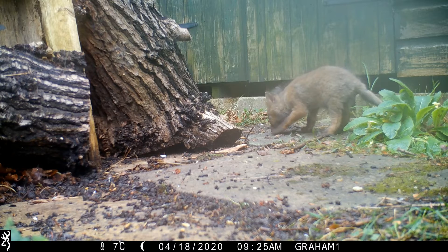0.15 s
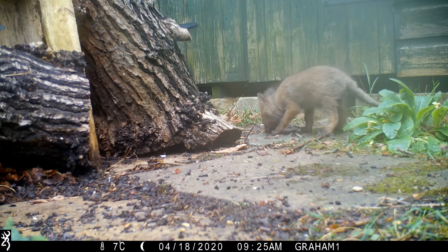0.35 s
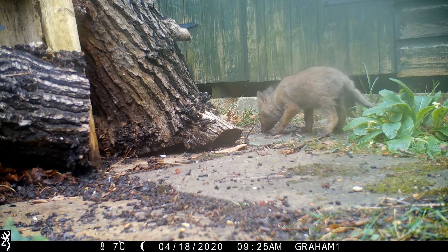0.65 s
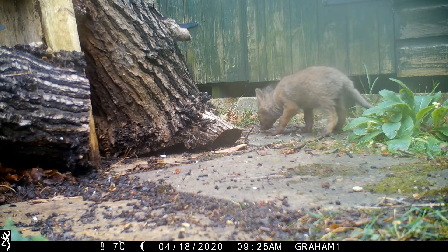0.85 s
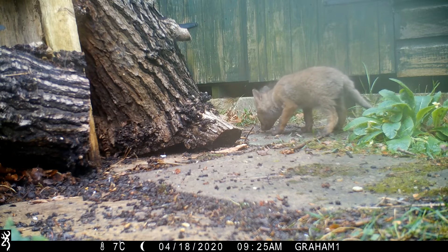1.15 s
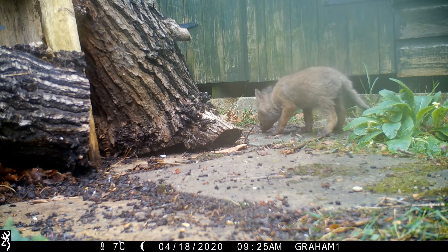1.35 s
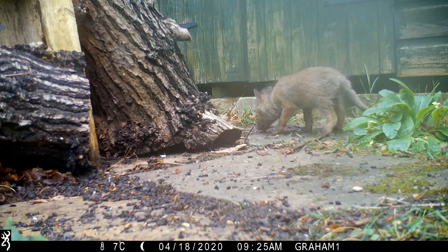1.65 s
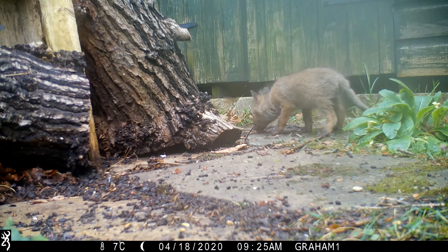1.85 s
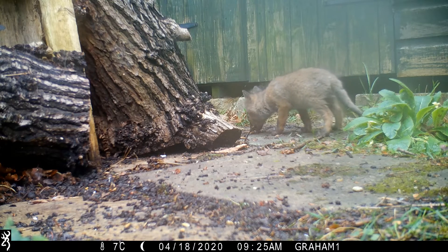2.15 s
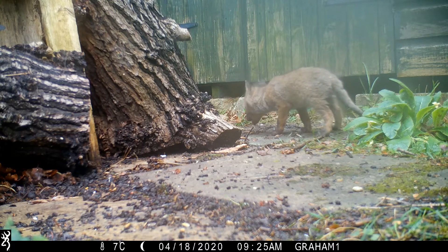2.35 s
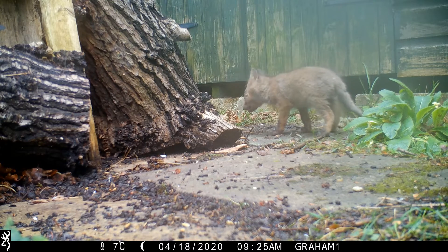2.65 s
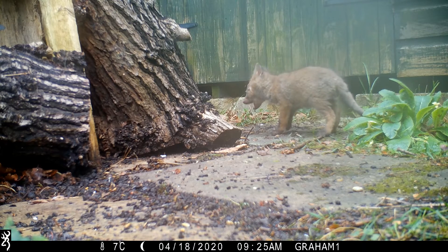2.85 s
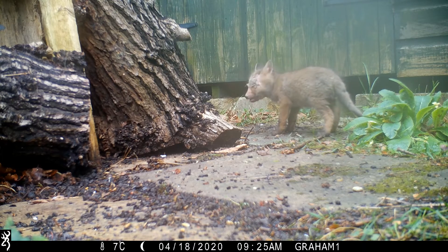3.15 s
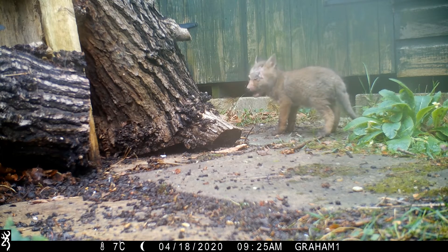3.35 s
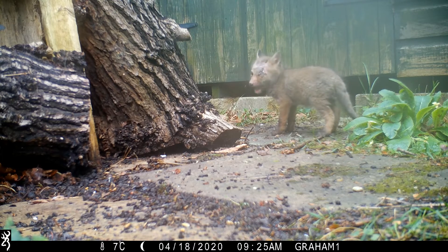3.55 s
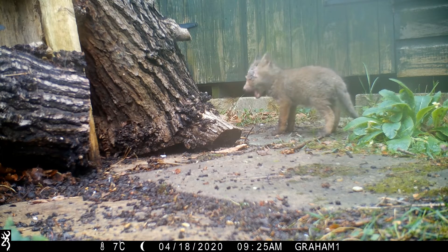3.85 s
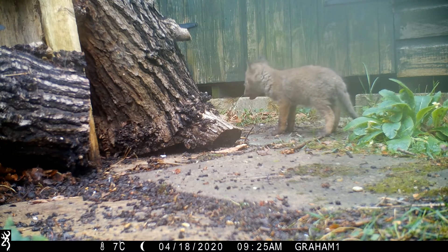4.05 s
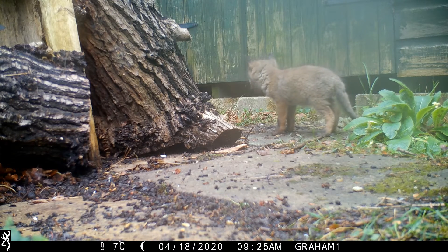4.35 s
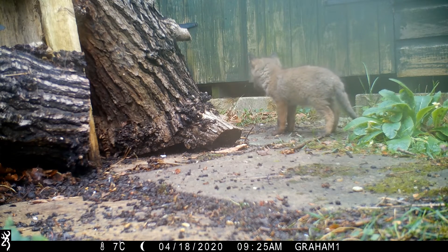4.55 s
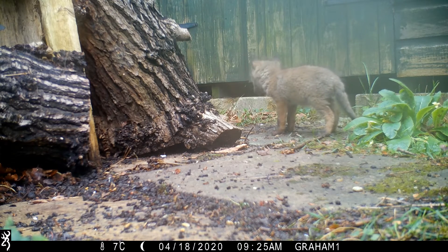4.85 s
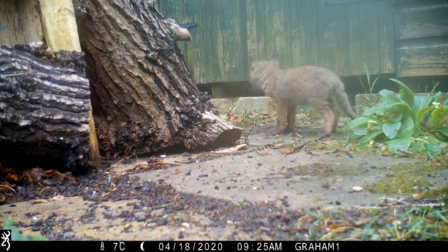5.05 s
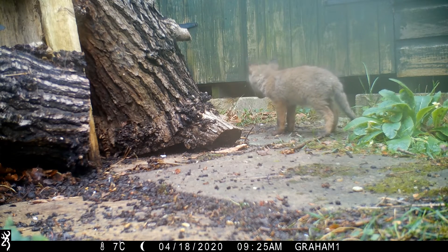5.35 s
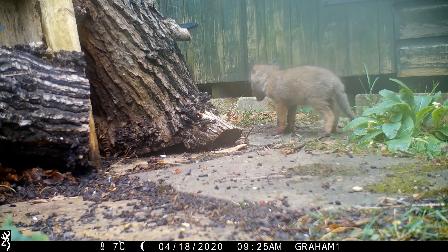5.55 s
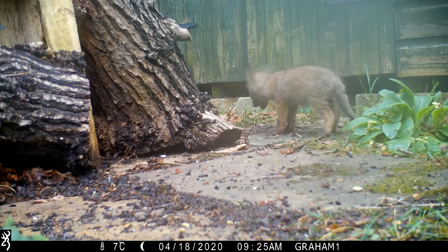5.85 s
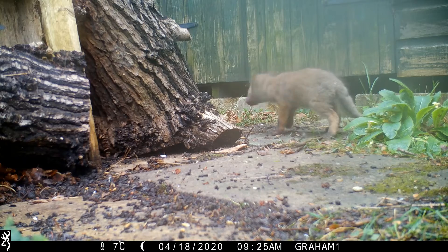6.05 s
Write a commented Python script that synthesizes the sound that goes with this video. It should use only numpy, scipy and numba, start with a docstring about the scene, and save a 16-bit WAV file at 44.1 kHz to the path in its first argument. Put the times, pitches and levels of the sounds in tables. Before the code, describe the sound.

A harsh magpie-like rattle runs for two seconds over a soft outdoor rush and faint birds, with one loud pop near the end.

```python
"""A fenced garden corner where a fox cub noses about, under a soft outdoor rush.
Small birds whistle far off and something scuffs grains of soil and leaf litter. A harsh rattle, most like
a magpie's, runs for two seconds: syrinx pulses through throat and bill, echoing off hard walls.
A trail camera adds a thin electronic whine and, near the end, one loud pop that overloads it."""
import sys
import numpy as np
from scipy import signal
from scipy.fft import rfft, irfft, next_fast_len
from scipy.io import wavfile
from scipy.ndimage import uniform_filter1d
from numba import njit

SR = 44100
rng = np.random.default_rng(int(sys.argv[2]) if len(sys.argv) > 2 else 0)


def persist_wave(psi):
    """Save psi, clipped to +-1, as 16-bit WAV."""
    counts = np.round(np.clip(psi, -1, 1) * 32767).astype(np.int16)
    wavfile.write(sys.argv[1], SR, np.atleast_2d(counts).T)


N = 273361
TIME = np.arange(N) / SR


def from_db(db):
    """Decibels to gain."""
    return 10 ** (np.asarray(db) / 20)


def unit_rms(x):
    """Scale to rms 1."""
    return x / np.sqrt(np.mean(x ** 2) + 1e-20)


def cut(x, hz, kind, order=2):
    """Butterworth low- or high-pass."""
    return signal.sosfilt(signal.butter(order, min(hz, .45 * SR), kind, fs=SR, output="sos"), x)


def resonate(x, hz, width_hz):
    """Two-pole resonance, peak gain 1."""
    r = np.exp(-np.pi * width_hz / SR)
    feedback = [1, -2 * r * np.cos(2 * np.pi * hz / SR), r * r]
    return signal.lfilter(np.array([1, 0, -1]) * (1 - r * r) / 2, feedback, x + 1e-18)


@njit
def moving_resonance(x, hz, width_hz):
    """Two-pole resonance with one centre frequency per sample."""
    r = np.exp(-np.pi * width_hz / SR)
    out = np.zeros(len(x))
    for i in range(2, len(x)):
        drive = (1 - r * r) / 2 * (x[i] - x[i - 2])
        out[i] = drive + 2 * r * np.cos(2 * np.pi * hz[i] / SR) * out[i - 1] - r * r * out[i - 2]
    return out


def drift(rate_hz):
    """Piecewise-linear random wander, rms 1."""
    knots = rng.standard_normal(int(TIME[-1] * rate_hz) + 2)
    return unit_rms(np.interp(TIME * rate_hz, np.arange(len(knots)), knots))


def swell(peak_s, rise_s, fall_s):
    """Asymmetric Gaussian envelope."""
    return np.exp(-.5 * ((TIME - peak_s) / np.where(TIME < peak_s, rise_s, fall_s)) ** 2)


def scatter(x, t60_s):
    """Diffuse return from leaves and fences."""
    t = TIME[:SR // 2]
    tail = rng.standard_normal(len(t)) * from_db(-60 * t / t60_s)
    return signal.fftconvolve(x, tail / np.sqrt(np.sum(tail ** 2)))[:N]


def outdoor_rush(level_db=-53.5, sway_db=.8):
    """Even rush of the neighbourhood: shaped noise, swaying slightly in level."""
    # rush spectrum: (frequency [Hz], relative density [dB])
    spectrum = [(15, -47.5), (25, -19.5), (140, -11), (214, -8), (240, -6), (423, -4.5), (589, -2),
                (763, -0.5), (819, -0.5), (1140, -0.5), (1660, -5), (2540, -11), (4070, -23), (7000, -45.5),
                (9100, -62), (15400, -120)]
    hz, db = np.transpose(spectrum)
    size = next_fast_len(N)
    bins_hz = np.maximum(np.fft.rfftfreq(size, 1 / SR), 1)
    gain = from_db(np.interp(np.log(bins_hz), np.log(hz), db))
    rush = irfft(rfft(rng.standard_normal(size)) * gain, size)[:N]
    return from_db(level_db + sway_db * drift(3.795)) * unit_rms(rush)


def camera_whine(whine_hz=7796.2, field_hz=59.5, whine_db=-71, tick_db=-51, hiss_db=-84.3):
    """A tone flips sign with each picture field, each flip leaking a tick, over preamplifier hiss."""
    polarity = np.sign(np.sin(np.pi * field_hz * (TIME - .0032)))
    whine = resonate(np.sin(2 * np.pi * whine_hz * TIME) * polarity, whine_hz, width_hz=3200)
    flips = np.diff(polarity, prepend=polarity[0]) / 2
    ticks = resonate(flips, hz=5000, width_hz=3000)
    leakage = cut(from_db(whine_db) * whine + from_db(tick_db) * ticks, 9000, "low", order=6)
    return leakage + from_db(hiss_db) * rng.standard_normal(N)


def songbirds(waver=.0099, flicker_db=3, fading_db=1, port_db=4, direct_db=-5, wet_db=-3.5):
    """Far whistled glides; distance dulls and smears them, the microphone port lifts one pitch."""
    # single arcs: (start [s], length [s], first [Hz], middle [Hz], last [Hz], level [dB])
    whistles = [(.3, 0.055, 1410, 1374, 1350, -47.5), (.714, 0.051, 4280, 4410, 5200, -64.5),
                (.97, 0.082, 5340, 5120, 4100, -62.5), (1.097, .085, 5800, 6350, 6700, -74),
                (1.267, .04, 4700, 5000, 5300, -70), (2.31, .044, 3930, 4170, 4520, -68),
                (2.665, 0.079, 5530, 5020, 3600, -63.5), (2.813, .11, 5850, 6000, 6040, -68.5),
                (3.398, 0.039, 4650, 4620, 4360, -62), (3.44, 0.045, 4520, 4610, 4300, -58),
                (3.948, 0.098, 6180, 6030, 5880, -66), (4.86, .12, 6900, 6780, 6650, -79)]
    # repeated falling notes:
    # (start [s], end [s], period [s], note length [s], first [Hz], last [Hz], level [dB])
    trills = [(1.394, 2.2, .18, .064, 6330, 4080, -65), (4.059, 4.8, .0872, .05, 6200, 3320, -62.5)]
    notes = list(whistles)
    for start_s, end_s, period_s, length_s, first_hz, last_hz, db in trills:
        for note_s in np.arange(start_s, end_s, period_s):
            notes.append((note_s, length_s, first_hz, np.sqrt(first_hz * last_hz), last_hz, db))
    song = np.zeros(N)
    wobble = 1 + waver * drift(200)
    for start_s, length_s, first_hz, middle_hz, last_hz, db in notes:
        on = (TIME >= start_s) & (TIME < start_s + length_s)
        progress = (TIME[on] - start_s) / length_s
        arc = np.polyfit([0, .5, 1], [first_hz, middle_hz, last_hz], 2)
        hz = np.polyval(arc, progress) * wobble[on]
        envelope = from_db(db) * np.sqrt(2 * np.sin(np.pi * progress))
        song[on] += envelope * np.sin(2 * np.pi * np.cumsum(hz) / SR)
    song *= from_db(flicker_db * drift(220) + fading_db * drift(12))
    song = cut(song, 4500, "low")
    song += from_db(port_db) * resonate(song, hz=4550, width_hz=220)
    return from_db(direct_db) * song + from_db(wet_db) * scatter(song, t60_s=.12)


def litter_scuffs(grains_per_s=4000, width_hz=750, top_hz=1600, wet_db=-11):
    """Dense dull grains of soil and dead leaves giving way."""
    # scuffs: (peak time [s], fade [s], level [dB], centre [Hz])
    scuffs = [(0.373, 0.016, -49, 830), (3.50, 0.09, -52, 1230), (4.0, 0.022, -53, 633),
              (4.104, 0.0064, -48, 1060), (4.181, 0.034, -44.5, 820), (4.27, 0.0066, -47, 1050),
              (4.455, 0.0046, -45.5, 895), (4.525, 0.014, -51, 696)]
    grains = rng.standard_normal(N) * (rng.random(N) < grains_per_s / SR)
    grains = cut(grains, top_hz, "low", order=8)
    out = np.zeros(N)
    for peak_s, fade_s, db, hz in scuffs:
        out += from_db(db) * swell(peak_s, fade_s / 2, fade_s) * unit_rms(resonate(grains, hz, width_hz))
    return out + from_db(wet_db) * scatter(out, t60_s=.36)


def syllables(start_s=.769, end_s=2.9, voiced_share=.41, rise_s=.0054, fall_s=.006):
    """Effort (gain) and bill gape (0 to 1) of the rattle; the bill opens and shuts once a syllable."""
    # syllable spacing, slowing unevenly: (time [s], period [s])
    pace = [(.77, .0739), (1.15, .0812), (1.41, .0949), (1.87, .0879), (2.05, .1052), (2.35, .0913),
            (2.74, .1061)]
    # call swells, holds, eases: (time [s], level [dB])
    loudness = [(.77, -40.5), (.86, -35.5), (1.35, -31.5), (2.74, -32), (2.85, -34.5)]
    effort, gape = np.zeros(N), np.zeros(N)
    on_s = start_s
    while on_s < end_s:
        period_s = np.interp(on_s, *np.transpose(pace))
        gain = from_db(np.interp(on_s, *np.transpose(loudness)))
        off_s = on_s + voiced_share * period_s
        knots_s = [on_s - rise_s, on_s + rise_s / 2, off_s - fall_s, off_s + fall_s]
        effort += gain * np.interp(TIME, knots_s, [0, .81, 1, 0])
        gape += np.interp(TIME, [on_s, (on_s + off_s) / 2, off_s + fall_s], [0, 1, 0])
        on_s += period_s
    return effort, np.sin(np.pi / 2 * gape)


def syrinx(pulse_hz=420, jitter=.3, uneven_db=2.5, rasp=.38, flutter_hz=132, flutter_db=1.5):
    """Uneven pulses in fluttering clumps; air escapes just after each pulse."""
    cycles = np.cumsum(pulse_hz * np.exp(jitter * drift(400))) / SR
    pulses = np.diff(np.floor(cycles), prepend=0)
    pulses *= from_db(uneven_db * np.clip(drift(300), -1.5, 1.5))
    breath = rng.standard_normal(N) * np.exp(-3 * (cycles % 1))
    flutter_cycles = np.cumsum(flutter_hz * np.exp(.12 * drift(60))) / SR
    clumps = from_db(flutter_db * np.sin(2 * np.pi * flutter_cycles))
    return cut((unit_rms(pulses) + rasp * unit_rms(breath)) * clumps, 520, "high")


def rattle(wander=.026, top_hz=3020, leak_db=-32, shut_hz=2550, shut_share=.63, gape_db=.73):
    """Syrinx bursts through throat and bill; the opening bill shifts the resonances and brightens them."""
    # throat and bill resonances: (centre [Hz], width [Hz], gain [dB], shift at full gape [fraction])
    formants = [(780, 820, -17.5, -0.26), (1312, 215, -0.5, 0.015), (1979, 217, 2, 0.061),
                (2278, 240, 0, 0.094), (2800, 560, -10, 0.084)]
    effort, gape = syllables()
    source = syrinx()
    voice = np.zeros(N)
    for k, (hz, width_hz, db, shift) in enumerate(formants):
        centre_hz = hz * (1 + shift * gape + wander * drift(15))
        voice += (-1) ** k * from_db(db) * moving_resonance(source, centre_hz, width_hz)
    leak = from_db(leak_db) * cut(source, 3400, "low", order=4)
    voice = cut(voice, top_hz, "low", order=10) + leak
    muffled = shut_share * (1 - gape)
    voice = np.sqrt(1 - muffled) * voice + np.sqrt(muffled) * cut(voice, shut_hz, "low", order=6)
    voice /= np.sqrt(uniform_filter1d(voice ** 2, size=600) + 1e-12)   # steady within a syllable
    return voice * effort * from_db(gape_db * (gape - 1.5))


def garden_corner(x, near_db=-4.5, ring_db=1, ring_width_hz=14, wet_db=-20):
    """Hard walls close by: distinct echoes, a short pitched ring and a faint wash."""
    # trunk, fence and shed echoes: (delay [s], gain [dB])
    echoes = [(.00512, -10.5), (.0074, -18), (0.0275, -5), (.035, -10.5), (.056, -14.5), (.078, -15.5)]
    # corner resonances: (frequency [Hz], relative gain [dB])
    modes = [(1200, -5), (1258, -6), (1338, 1), (1375, -8), (1432, -4), (1482, -1), (1573, -1), (1733, -1),
             (1776, -6), (1891, 0), (1960, -3), (2004, -4), (2039, -1), (2074, -2), (2175, -1), (2208, 1),
             (2320, -1), (2350, 1), (2432, 1), (2470, -4), (2712, -1), (2821, -4), (2966, -3), (3080, -2),
             (3246, -1)]
    arrivals = x + sum(from_db(db) * np.interp(TIME - delay_s, TIME, x, left=0) for delay_s, db in echoes)
    ring = sum(from_db(db) * resonate(arrivals, hz, ring_width_hz) for hz, db in modes)
    near = arrivals + from_db(ring_db) * ring
    return from_db(near_db) * near + from_db(wet_db) * scatter(x, t60_s=.79)


def electrical_pop(start_s=5.77868, sharpness=3.9, drain_height=.21, drain_s=.0007, coupling_hz=11):
    """A glitch swings the input down, then up; the charge drains, the coupling capacitor recovers."""
    # glitch spikes: (delay [s], height [full scale], rise [s])
    spikes = [(0, -1.4, 0.00031), (.00073, 1.14, 0.00045)]
    out = np.zeros(N)
    for delay_s, height, rise_s in spikes:
        age = np.maximum(TIME - start_s - delay_s, 0) / rise_s
        out += height * (age * np.exp(1 - age)) ** sharpness
    delay_s, _, rise_s = spikes[-1]
    age = np.maximum(TIME - start_s - delay_s - rise_s, 0) / drain_s   # from the last peak
    out += drain_height * (age * np.exp(1 - age)) ** 2
    return cut(out + 1e-18, coupling_hz, "high")


def scene():
    """Mono sum of all sources."""
    garden = garden_corner(rattle()) + songbirds() + litter_scuffs() + outdoor_rush()
    return (garden + camera_whine() + electrical_pop())[None]


def record(dry, ceiling=.95, cutoff_hz=15800):
    """Hard converter clipping, then a steep low-pass."""
    return cut(np.clip(dry, -ceiling, ceiling), cutoff_hz, "low", order=20)


dry = scene()
out = record(dry)
persist_wave(out)
```